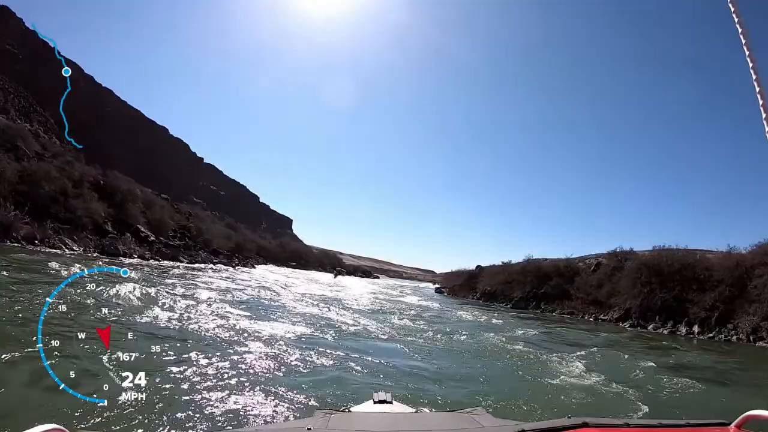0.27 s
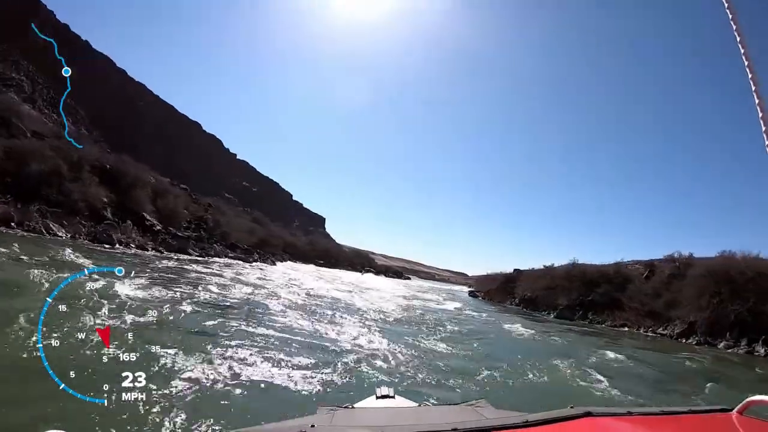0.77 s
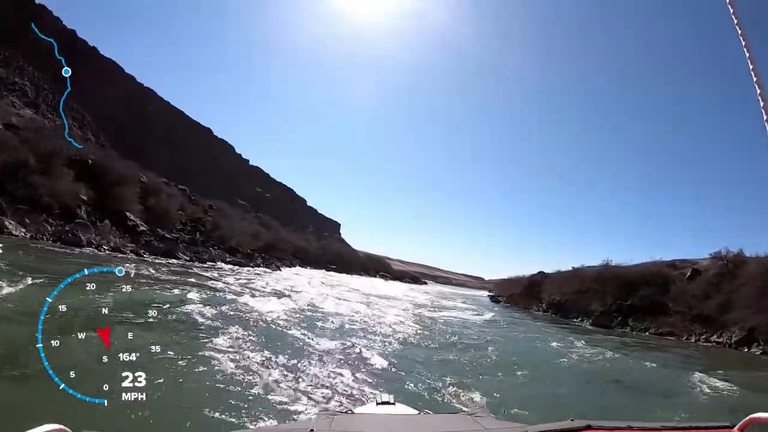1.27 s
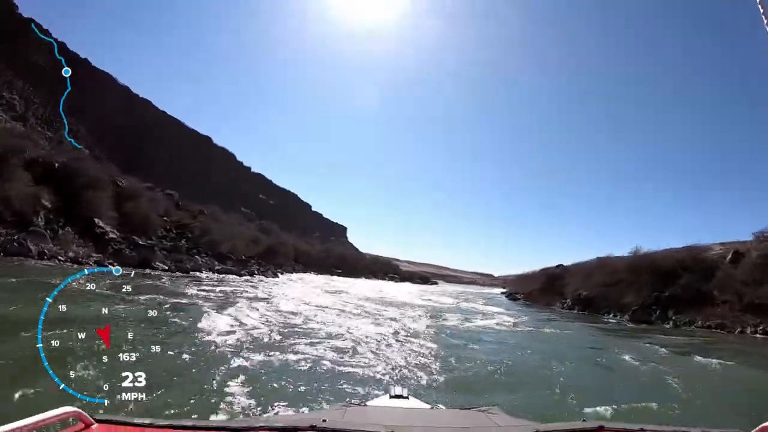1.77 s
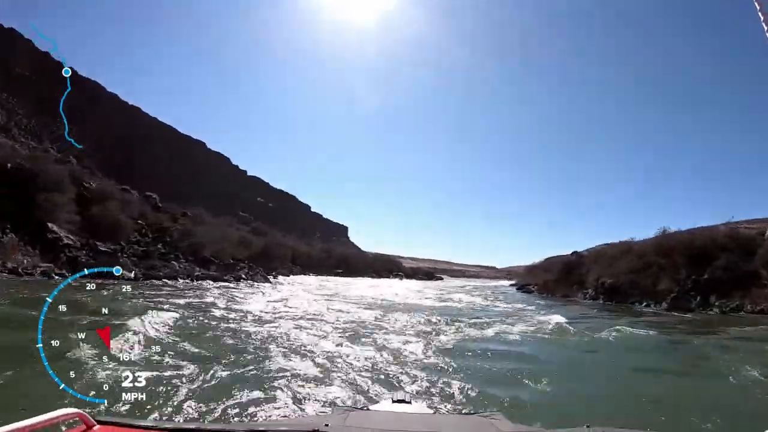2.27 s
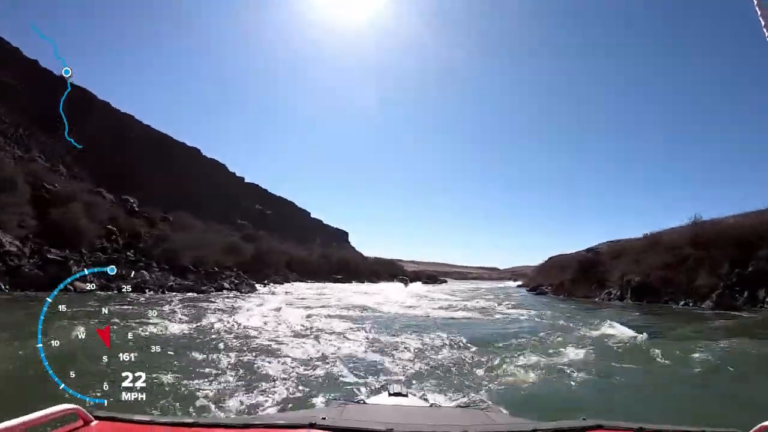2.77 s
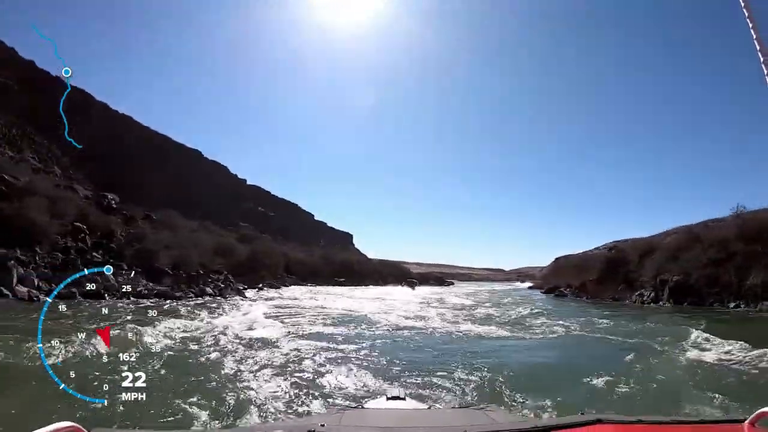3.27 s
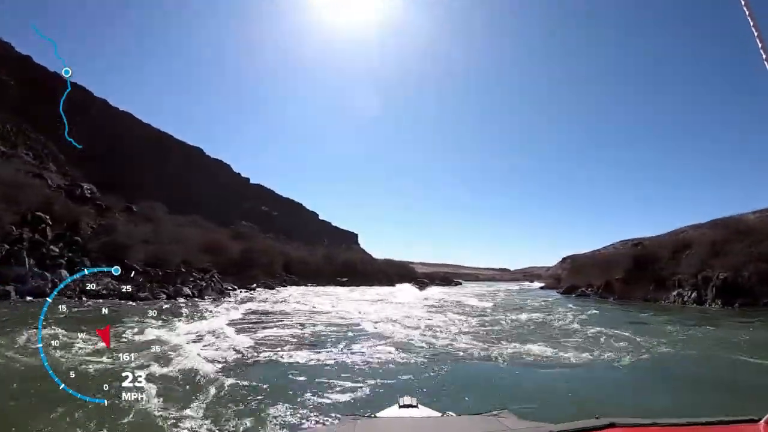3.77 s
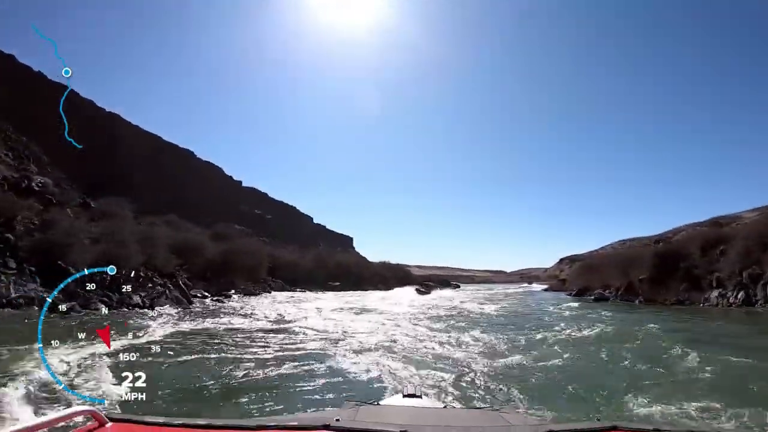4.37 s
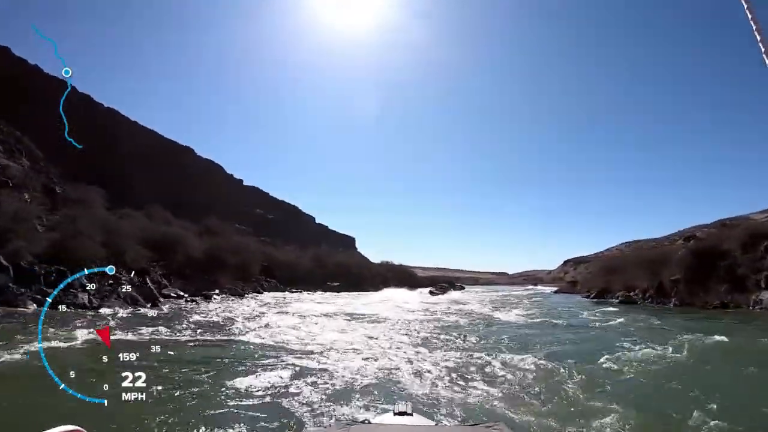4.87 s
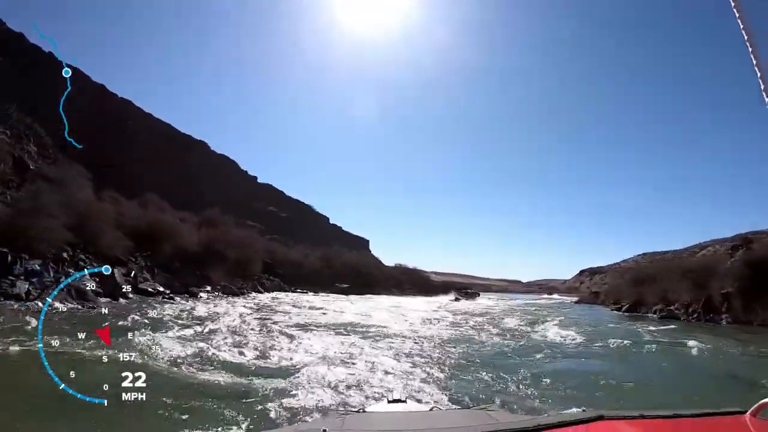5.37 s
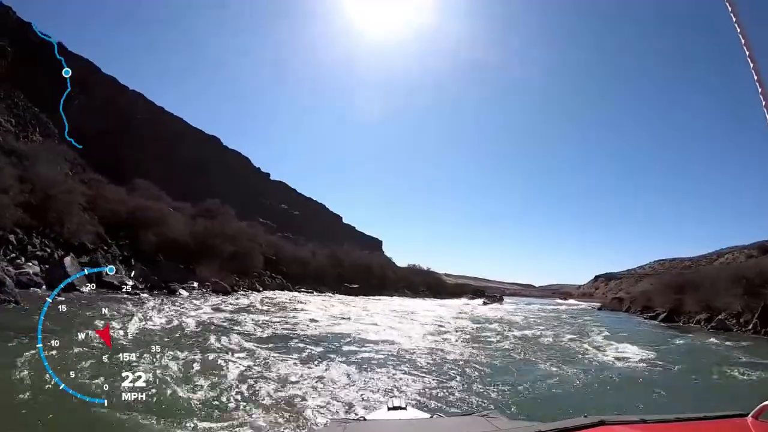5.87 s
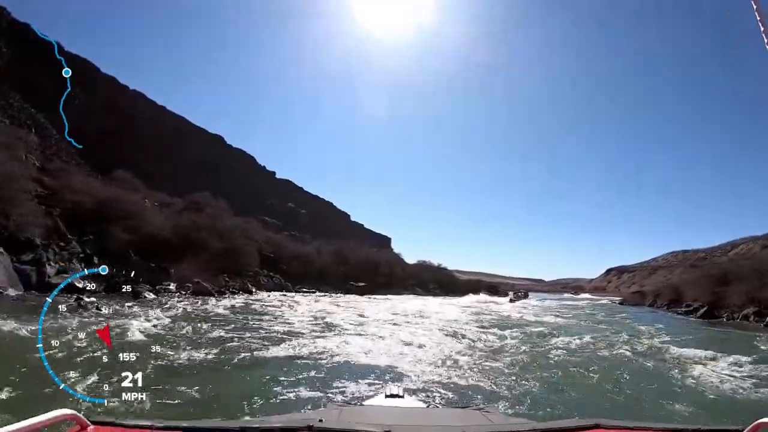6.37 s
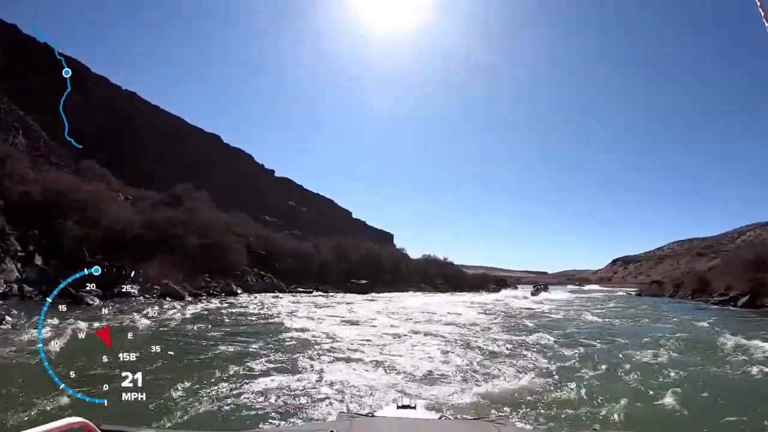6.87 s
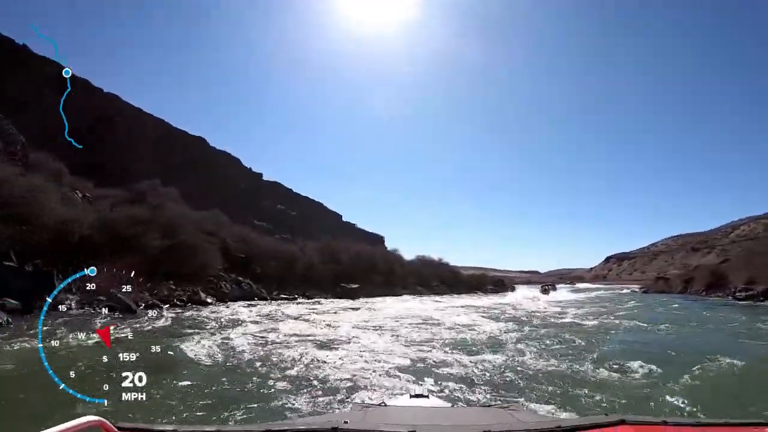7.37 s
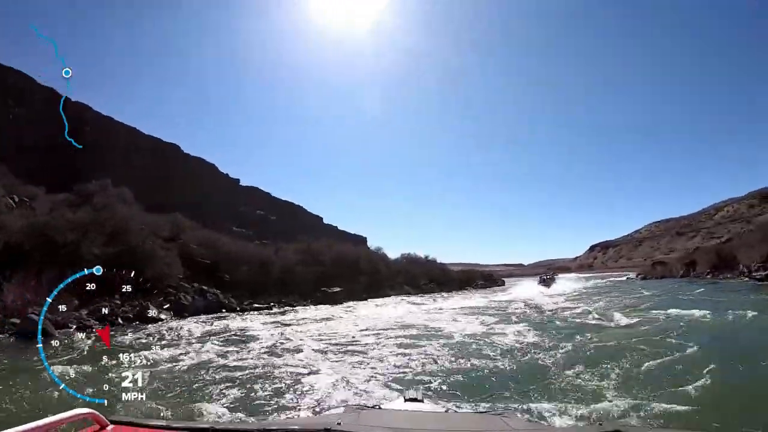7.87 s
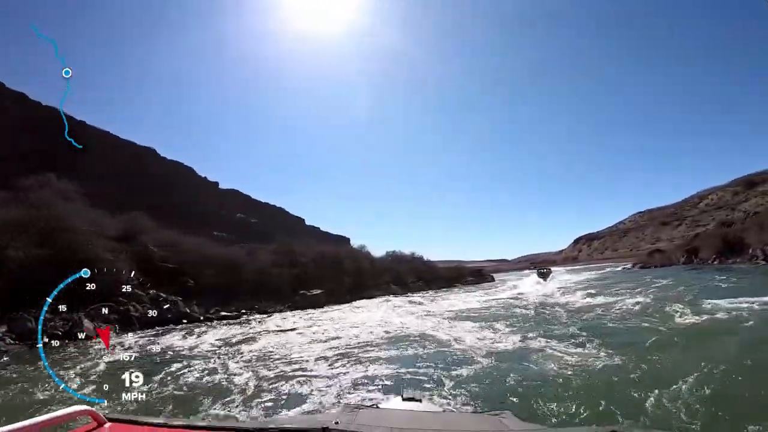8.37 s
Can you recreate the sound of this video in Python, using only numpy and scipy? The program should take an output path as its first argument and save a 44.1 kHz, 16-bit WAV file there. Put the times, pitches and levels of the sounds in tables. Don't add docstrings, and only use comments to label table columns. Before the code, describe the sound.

A boat's eight-cylinder engine drones and booms with shifting pitch through the hull, under rumbling, buffeting wind and a steady hiss of whitewater.

```python
import sys
import numpy as np
from scipy import signal
from scipy.fft import rfft, irfft, next_fast_len
from scipy.io import wavfile
from scipy.ndimage import uniform_filter1d, minimum_filter1d

SR = 44100
rng = np.random.default_rng(int(sys.argv[2]) if len(sys.argv) > 2 else 0)


def wav_record(signal):
    frames = np.transpose(np.atleast_2d(signal))
    bounded = np.clip(frames, -1, 1)
    quanta = np.round(bounded * 32767).astype(np.int16)
    wavfile.write(sys.argv[1], SR, quanta)


def linear_from_db(decibels):
    return 10 ** (np.asarray(decibels, float) / 20)


N = 380141

# t/s, firing rate f/Hz, load/dB
ENGINE_RUN = [(0, 242, 1), (.7, 243, 4), (1.1, 195, 1), (1.36, 192, 5), (1.65, 210, 2), (3.15, 217, -1),
              (3.85, 200, 0), (4.2, 208, -3), (4.55, 236, -1), (5.05, 238, 0), (5.46, 196, 0),
              (5.8, 198, 0), (6.5, 225, 2), (6.88, 198, 0), (7.68, 185, -6), (7.9, 163, -3), (8.03, 187, 1),
              (8.62, 251, 2)]


def level(x, db):
    return x * linear_from_db(db) / np.sqrt(np.mean(x ** 2))


def curves(table):
    s, *columns = np.transpose(table)
    return [np.interp(np.arange(N) / SR, s, c) for c in columns]


def walk(rate_hz):
    k = int(SR / rate_hz)
    held = np.repeat(rng.standard_normal(N // 200), k)[:N]
    return 0.92 * uniform_filter1d(uniform_filter1d(held, k), k)


def turbulence(spectrum, shared_db, own_db, own_rate_hz):
    hz, db = np.transpose(spectrum)
    size = next_fast_len(N)
    octave = np.log2(np.maximum(np.fft.rfftfreq(size, 1 / SR), 1))
    colour_db = np.interp(octave, np.log2(hz), db, left=-90, right=-120)
    colour = linear_from_db(colour_db) * rfft(rng.standard_normal(size))
    out = 0
    for centre in np.arange(np.log2(hz[0]), np.log2(hz[-1]) + 1, 2 / 3):
        share = np.clip(1 - np.abs(octave - centre) * 3 / 2, 0, 1)
        out = out + linear_from_db(own_db * walk(own_rate_hz)) * irfft(colour * share)[:N]
    return level(out * linear_from_db(shared_db), 0)


def drops():
    # t/s, peak level/dB
    impacts = [(0.0665, -67), (0.1999, -64.5), (0.3164, -62), (0.617, -64.5), (0.7836, -67.5),
               (0.9502, -72), (1.3678, -65), (1.4012, -67.5), (1.4845, -63), (1.5663, -74), (1.6177, -65.5),
               (1.6511, -72), (1.7845, -62.5), (1.9016, -62.5), (2.0344, -65.5), (2.3685, -65),
               (2.6189, -64), (2.7357, -66), (2.819, -61), (3.101, -69), (3.1193, -70), (3.4531, -56.5),
               (4.12, -69.5), (4.2033, -70), (4.2872, -66), (4.3585, -75), (4.3705, -68.5), (4.4039, -68),
               (4.4538, -71), (4.4855, -66.5), (4.6209, -67), (4.737, -68), (4.8209, -76), (4.8704, -66.5),
               (5.2046, -60), (5.4054, -68), (5.455, -70.5), (5.655, -69.5), (5.7392, -66), (5.8721, -65.5),
               (5.9888, -69), (6.0721, -64.5), (6.2058, -57), (6.4058, -67.5), (6.7895, -66), (7.1566, -74),
               (7.2065, -71.5), (7.5398, -68.5), (7.5735, -62.5), (7.657, -67.5), (7.7064, -64.5),
               (7.7907, -72.5), (7.9573, -69), (7.991, -71.5), (8.3245, -66), (8.4074, -69.5)]
    patter_per_s = 40
    ticks = rng.standard_normal(N) * (rng.random(N) < patter_per_s / SR) * linear_from_db(-69)
    s, db = np.transpose(impacts)
    ticks[(s * SR).astype(int)] = linear_from_db(db + 12.5)
    ring = np.convolve(np.abs(ticks), np.exp(-np.arange(200) / 45))[:N]
    ticks = ticks + .3 * ring * rng.standard_normal(N)
    return signal.sosfilt(signal.butter(6, 10500, "high", fs=SR, output="sos"), ticks)


def water(gust_db, boom_over_db):
    # t/s, level/dB
    wash_run = [(0, 1), (.2, 0), (.9, -1), (1.1, -4.5), (1.33, -3.5), (1.5, -1.5), (2.1, -1), (2.75, 2.5),
                (3.25, 0), (3.7, -3), (3.9, -1), (4.35, 1.5), (5.4, -3), (5.6, -1.5), (6.55, 0), (7.5, 1.5),
                (7.9, -3), (8.62, 1)]
    # f/Hz, density/dB per Hz
    hiss_spectrum = [(290, -28), (500, -4), (700, -10), (1200, -10), (1600, -15), (2500, -18),
                     (3700, -19.5), (5500, -31.5), (7500, -40.5)]
    # f/Hz, density/dB per Hz
    spray_spectrum = [(3500, -11), (5000, -0.5), (6400, -6), (8000, -5.5), (9500, -11), (10700, -23),
                      (12300, -31.5), (14000, -35), (16500, -52.5)]
    wash_db = curves(wash_run)[0]
    hiss_db = -45 + 0.52 * wash_db - 0.11 * boom_over_db + 0.11 * gust_db
    spray_db = -60 + wash_db + 0.19 * gust_db
    hiss = turbulence(hiss_spectrum, .5 * walk(24), own_db=0.44, own_rate_hz=12)
    spray = turbulence(spray_spectrum, .4 * walk(10), own_db=1.5, own_rate_hz=15)
    return linear_from_db(hiss_db) * hiss + linear_from_db(spray_db) * spray


def gusts():
    # t/s, rise/dB, length/s, extra flutter/dB
    peaks = [(0.197, 2, 0.24, 4.5), (1.75, 8, 0.13, -4), (2.073, 6, 0.075, -0.5), (2.218, 8, 0.036, 3),
             (2.363, 13, 0.01, 4), (4.363, 5, 0.018, 9), (4.608, 2.5, 0.021, 0), (2.985, 10, 0.023, -2),
             (3.199, 7, 0.015, 2), (3.327, 10, 0.028, 2), (3.434, 8.5, 0.022, -19), (3.548, 10.5, 0.034, 2),
             (3.779, 15.5, 0.044, 3), (3.935, 12.5, 0.047, -1.5), (4.054, 18, 0.011, -12),
             (8.597, 8, 0.045, 1), (4.48, 5.5, 0.03, 4), (4.752, 11, 0.019, 7.5), (4.839, 16.5, 0.019, 5),
             (4.929, 14, 0.019, -14), (5.055, 10, 0.04, 3), (5.358, 12, 0.11, 7), (5.779, 14, 0.017, -1.5),
             (5.936, 13, 0.028, -12), (6.182, 11, 0.042, -3.5), (6.777, 4, 0.057, 0), (4.2, 12, 0.026, -9),
             (4.88, 4, 0.028, -2), (6.968, 10, 0.022, 3.5), (7.084, 8, 0.012, 2.5),
             (7.212, 11.5, 0.016, -1), (4.124, 6.5, .05, -7), (6.09, 1.5, .05, -1), (4.554, 3.5, .04, 0.5),
             (8.083, 5, 0.11, -7.5)]
    dip_share, dip_after_s, dip_s = 0.28, 0.026, 0.026
    t = np.arange(N) / SR
    rise_db, extra_db, dip_db = np.zeros(N), np.zeros(N), np.zeros(N)
    for s, db, length_s, flutter_db in peaks:
        bell = np.exp(-((t - s) / length_s) ** 2)
        rise_db = np.maximum(rise_db, db * bell)
        extra_db += flutter_db * bell
        dip_db += dip_share * db * np.exp(-((t - s - length_s - dip_after_s) / dip_s) ** 2)
    return rise_db - dip_db, extra_db


def wind(gust_db, extra_db, boom_over_db):
    # t/s, level/dB, share of big slow eddies/dB
    breeze = [(0, 3.5, 2), (.4, 5.5, -2), (1.0, 7.5, -2), (1.3, 9.5, -6), (2.0, 5, -5.5), (2.7, 5.5, 1.5),
              (3.2, 0, 5), (4.15, -3.5, 6.5), (4.65, 7, 0.5), (5.2, -2.5, 3.5), (5.5, -3.5, 3),
              (6.3, 8, -7), (6.62, 10.5, -4.5), (7.0, 3, 0.5), (7.4, 3.5, 0.5), (7.8, 4.5, -1.5),
              (8.15, 6, -1.5), (8.5, 7, -7)]
    # f/Hz, density/dB per Hz
    rumble_spectrum = [(18, 3.5), (30, -6), (45, 3.5), (80, 0), (130, -0.5), (200, -6), (300, -20),
                       (450, -22)]
    # f/Hz, density/dB per Hz
    flutter_spectrum = [(100, -3), (180, -0.5), (280, 1), (450, -8), (700, -12.5), (1100, -23), (2000, -28),
                        (4000, -39)]
    breeze_db, slow_db = curves(breeze)
    duck_db = -.55 * boom_over_db
    rumble_db = -33 + breeze_db + slow_db + 0.97 * gust_db + duck_db
    flutter_db = -40 + 0.98 * breeze_db + 0.59 * gust_db + extra_db + 0.33 * duck_db
    buffet = walk(17)
    rumble = turbulence(rumble_spectrum, .8 * buffet + 1.5 * walk(35), own_db=1.6, own_rate_hz=14)
    flutter = turbulence(flutter_spectrum, 1.5 * buffet + 1.8 * walk(50), own_db=1.6, own_rate_hz=25)
    return linear_from_db(rumble_db) * rumble + linear_from_db(flutter_db) * flutter


def eddies():
    # peak t/s, level/dB, bright core re level/dB
    sharp = [(.232, -27.5, -19), (.347, -28.5, -12), (.74, -30, -23), (1.699, -31, -16), (1.717, -33, -16),
             (1.781, -30.5, -17), (2.221, -28.5, -18), (2.351, -32, -12), (2.368, -30, -18),
             (3.196, -30, -18), (3.451, -27, -16), (3.557, -29, -26), (3.765, -30, -10),
             (4.055, -31.5, -19), (4.202, -31, -20), (4.451, -30, -12), (4.508, -31, -9),
             (4.614, -28.5, -13), (4.832, -26, -17), (4.844, -28, -3), (4.857, -31.5, -12),
             (5.059, -31.5, -12), (5.385, -28, -13), (5.695, -31, -12), (5.888, -28.5, -12),
             (5.937, -29, -9), (6.206, -31, -18), (8.122, -32, -18), (6.969, -33, -20), (6.984, -30, -16)]
    swirls = [1, 1.6, 1.726, 1.9, 3, 3.1, 2.6, 2.5, 3.337, 3.8, 3.584, 3.4, 4.3, 4.2, 4.141, 3, 3.6, 5.4,
              4.42, 4.934, 5.044, 4.8, 5.7, 6.7, 5.42, 8.6]
    # f/Hz, density/dB per Hz
    body_spectrum = [(100, 4), (200, -1.5), (350, 4), (550, -5.5), (900, -15.5), (1500, -26), (2400, -40)]
    swirl_db, swirl_bright_db, eddy_s = -34.5, -17, 0.0052
    core_band = signal.butter(4, [1100, 3400], "band", fs=SR, output="sos")
    core = signal.sosfilt(core_band, rng.standard_normal(N))
    body = turbulence(body_spectrum, 0, own_db=1.5, own_rate_hz=30)
    out = np.zeros(N)
    for s, db, bright_db in sharp + [(s, swirl_db, swirl_bright_db) for s in swirls]:
        i = np.arange(int((s - .05) * SR), min(int((s + 0.043) * SR), N))
        age = (i / SR - s) / eddy_s
        parts = [(body, db + 1.5, np.exp(-age ** 2 / 2)),
                 (core, db + bright_db - 6.5, np.exp(-age ** 2 / 1.1)),
                 (body, db - 8, np.exp(-age ** 2 / 16))]
        for noise, peak_db, bell in parts:
            strength = np.sqrt(np.sum(bell ** 2) / np.sum((bell * noise[i]) ** 2))
            out[i] += linear_from_db(peak_db) * strength * bell * noise[i]
        ms = (i / SR - s) * 1000
        out[i] -= linear_from_db(db + 7) * np.tanh(ms / .17) * np.exp(-np.abs(ms) / .8)
    return out


def eddy_onsets():
    # t/s, peak level/dB
    hits = [(0.225, -23), (0.342, -35), (1.777, -24), (2.093, -21.5), (2.218, -31), (2.34, -32),
            (2.371, -33), (2.539, -37), (2.695, -21), (2.798, -27), (2.975, -23), (3.196, -19),
            (3.339, -23), (3.438, -19), (3.518, -26.5), (3.551, -20), (3.574, -23), (3.746, -32),
            (3.761, -19), (3.787, -20.5), (3.808, -21), (3.83, -25), (3.945, -23.5), (4.053, -16),
            (4.197, -36), (4.363, -22.5), (4.449, -20.5), (4.503, -24), (4.582, -36), (4.604, -22),
            (4.661, -24), (4.728, -20), (4.824, -21), (4.843, -16), (4.919, -15), (5.012, -25),
            (5.039, -25), (5.069, -28), (5.35, -32), (5.37, -21), (5.4, -29), (5.424, -25.5), (5.442, -31),
            (5.682, -21), (5.691, -22), (5.774, -25), (5.868, -31), (5.89, -24), (5.936, -22.5),
            (5.969, -23), (6.201, -20), (6.476, -20), (6.983, -16), (8.116, -27)]
    # f/Hz, density/dB per Hz
    burst_spectrum = [(300, -6.5), (500, 7), (800, -5.5), (1300, -10.5), (2200, -22.5), (3500, -31)]
    attack_s, decay_s, tail_s, tail_db = 0.00048, 0.0067, 0.021, -11
    burst_noise = turbulence(burst_spectrum, 1.9 * walk(120), own_db=0, own_rate_hz=55)
    age = np.arange(int(.12 * SR)) / SR
    fall = np.exp(-age / decay_s) + linear_from_db(tail_db) * np.exp(-age / tail_s)
    shape = np.minimum(age / attack_s, 1) * fall
    out = np.zeros(N)
    for s, db in hits:
        i = int(s * SR)
        burst = shape * burst_noise[i:i + len(age)]
        out[i:i + len(age)] += linear_from_db(db - 4) * burst / np.abs(burst[:len(age) // 16]).max()
    return out


def firing():
    # full strength at t/s, hold/s, level/dB
    booms = [(.82, .32, -28), (1.15, .1, -26), (1.22, .04, -24), (1.28, .07, -21), (1.35, .1, -21.5),
             (1.45, .03, -25), (1.52, .1, -32), (1.71, .02, -29), (3.8, .05, -26), (5.18, .1, -34),
             (5.46, .16, -30), (5.62, .045, -25), (6.86, .05, -26), (7.05, .16, -26), (7.24, .14, -25.5),
             (7.39, .13, -23.5), (7.53, .12, -18), (7.64, .28, -16.8), (7.92, .05, -18), (7.97, .04, -20.5),
             (8.025, .01, -19), (8.07, .04, -26), (8.112, .01, -20)]
    inertia_s, rise_db_per_s, fall_db_per_s = 0.1, 260, 900
    t = np.arange(N) / SR
    hz = uniform_filter1d(curves(ENGINE_RUN)[0], size=int(inertia_s * SR))
    tone_db = -38 - 0.12 * (hz - 215)
    for s, hold_s, db in booms:
        edge_db = np.minimum(rise_db_per_s * (t - s), fall_db_per_s * (s + hold_s - t))
        tone_db = np.maximum(tone_db, db + np.minimum(edge_db, 0))
    return hz, tone_db


def pump_whine(cycle):
    # t/s, level/dB
    bite = [(0, -62), (.4, -52), (.85, -46), (1.1, -53), (1.4, -66), (1.9, -60), (2.4, -51), (3.15, -50),
            (3.4, -64), (5.1, -62), (5.25, -49), (5.4, -62), (8.62, -62)]
    # multiple of cycle, level/dB
    orders = [(24, 0), (25, -11), (29, -8), (32, -12), (33, -16)]
    whine = 0
    for k, db in orders:
        order_db = db + 2 - 5 * np.abs(walk(5))
        whine = whine + linear_from_db(order_db) * np.sin(k * cycle + .6 * walk(8))
    return linear_from_db(curves(bite)[0]) * whine


def part_orders(cycle, firing_hz, tone_db):
    # multiple of cycle, level/dB
    orders = [(2, -6.5), (3, -8), (4, -4), (5, -6), (6, -6), (7, -9), (9, -12), (10, -11), (11, -13),
              (12, -15), (13, -14), (14, -24), (15, -21), (17, -22), (18, -24), (20, -19), (21, -22),
              (22, -22), (28, -28)]
    # f/Hz, width/Hz, lift/dB
    panels = [(149, 12, 8), (277, 12, 7)]
    load_db = curves(ENGINE_RUN)[1]
    lumpy = 0
    for k, db in orders:
        hz = k * firing_hz / 8
        hull_db = sum(lift_db / (1 + ((hz - f) / width) ** 2) for f, width, lift_db in panels)
        drive_db = load_db if k < 8 else -1
        order_db = db + hull_db + drive_db + 2 - 3.5 * np.abs(walk(6))
        phase = 2 * np.pi * rng.random() + .045 * k * walk(8)
        lumpy = lumpy + linear_from_db(order_db) * np.sin(k * cycle + phase)
    return linear_from_db(-34.5 - 1.6 * np.maximum(tone_db + 23, 0)) * lumpy


def engine(firing_hz, tone_db):
    cycle = 2 * np.pi * np.cumsum(firing_hz) / (8 * SR)
    octave = linear_from_db(-31.5 + 2 * walk(12)) * np.sin(16 * cycle + .8 * walk(20))
    scatter_db = 1.2 + .3 * np.clip(-20 - tone_db, 0, 13)
    jitter = .3 * walk(30) + .5 * walk(9)
    tone = linear_from_db(scatter_db * walk(18)) * np.sin(8 * cycle + jitter) + octave
    return np.sqrt(2) * (linear_from_db(tone_db) * tone + part_orders(cycle, firing_hz, tone_db) + pump_whine(cycle))


def scene():
    gust_db, extra_db = gusts()
    firing_hz, tone_db = firing()
    boom_over_db = np.maximum(tone_db + 30, 0)
    river = drops() + water(gust_db, boom_over_db)
    air = wind(gust_db, extra_db, boom_over_db) + eddies()
    return (river + air + eddy_onsets() + engine(firing_hz, tone_db))[None]


def roll_off(x):
    return signal.sosfilt(signal.butter(12, 15720, fs=SR, output="sos"), x)


def record(dry):
    ceiling_db = -11.5
    peak = -minimum_filter1d(-np.abs(dry), size=441, axis=1)
    gain = np.minimum(1, linear_from_db(ceiling_db) / (peak + 1e-9))
    gain = uniform_filter1d(uniform_filter1d(gain, size=221, axis=1), size=221, axis=1)
    to_end = np.minimum(np.arange(N), np.arange(N)[::-1])
    mix = dry * gain * np.minimum(1, to_end / 60)
    return roll_off(mix)


dry = scene()
out = record(dry)
wav_record(out)
```